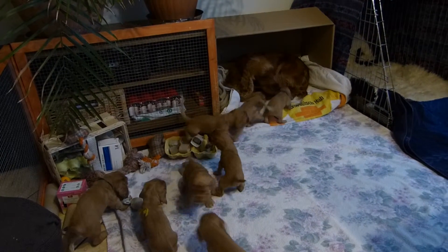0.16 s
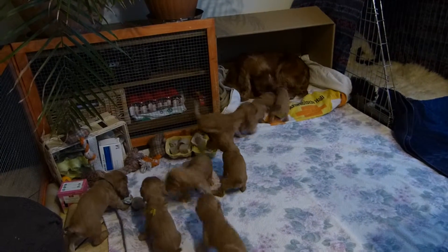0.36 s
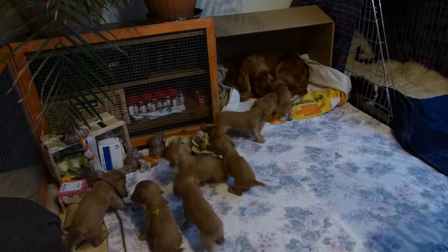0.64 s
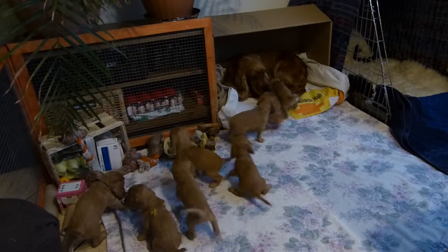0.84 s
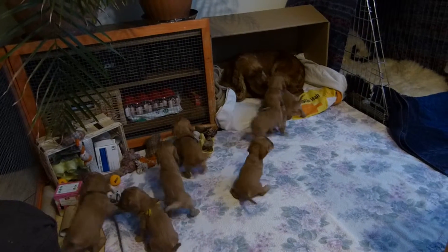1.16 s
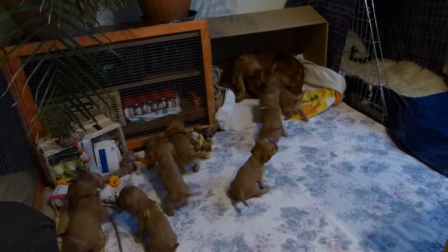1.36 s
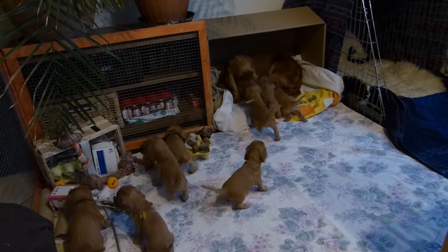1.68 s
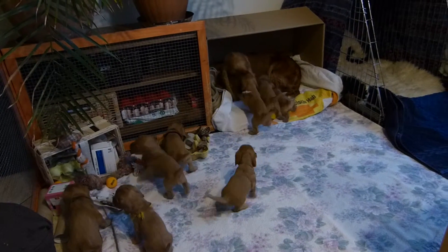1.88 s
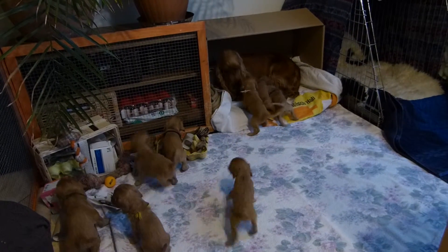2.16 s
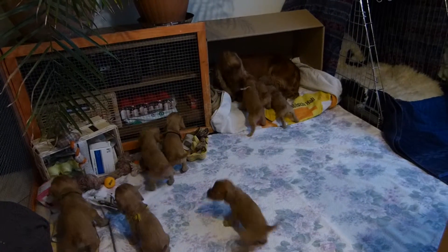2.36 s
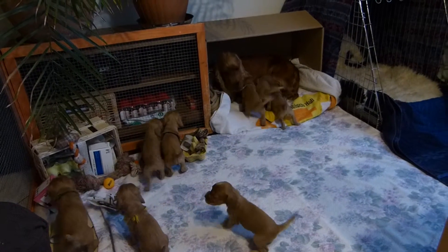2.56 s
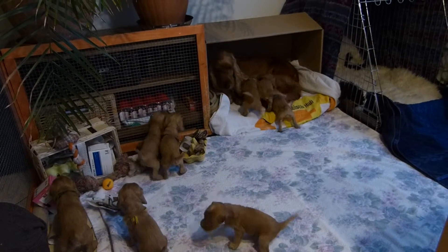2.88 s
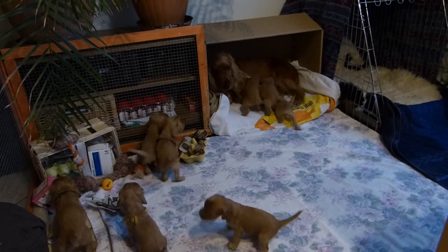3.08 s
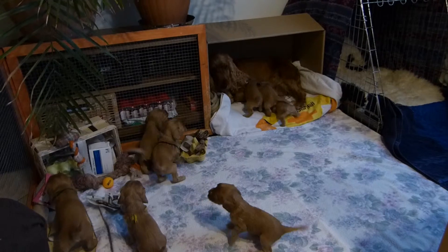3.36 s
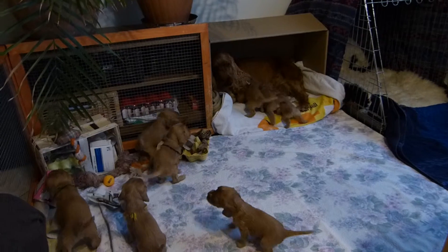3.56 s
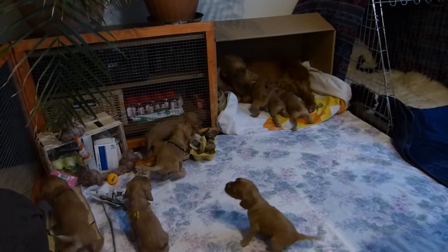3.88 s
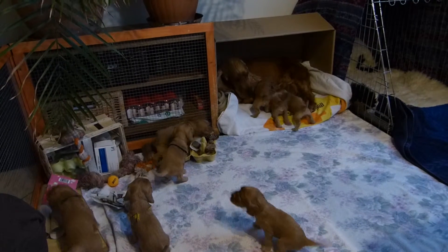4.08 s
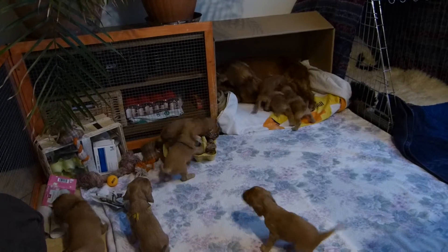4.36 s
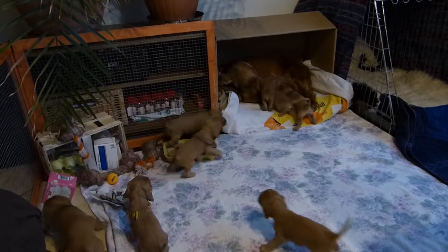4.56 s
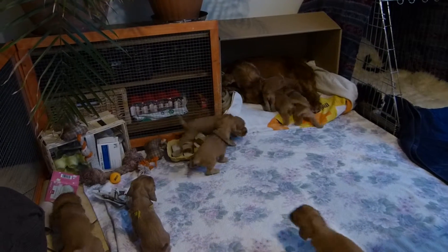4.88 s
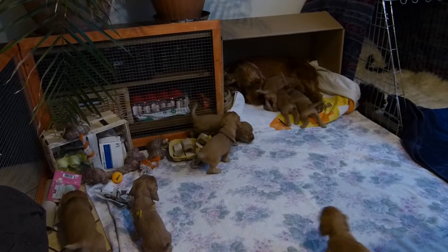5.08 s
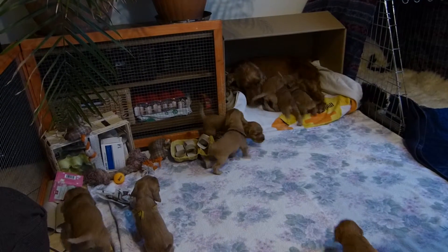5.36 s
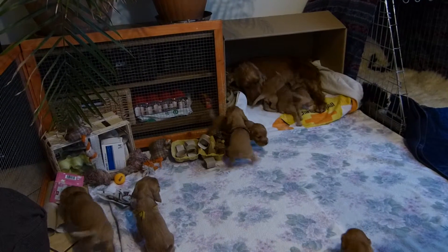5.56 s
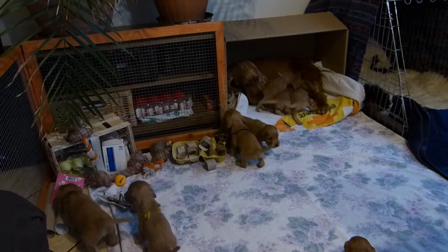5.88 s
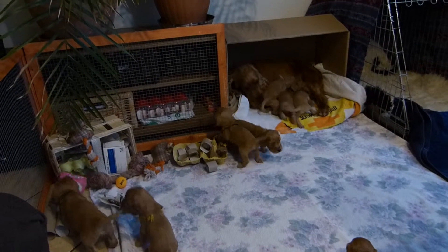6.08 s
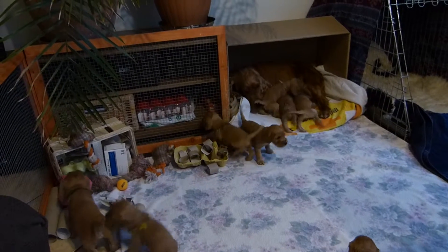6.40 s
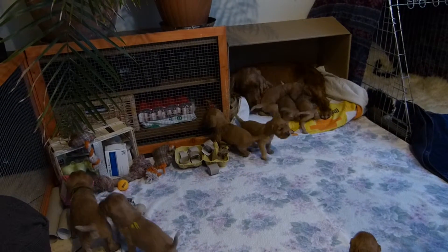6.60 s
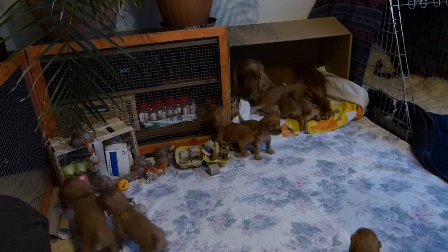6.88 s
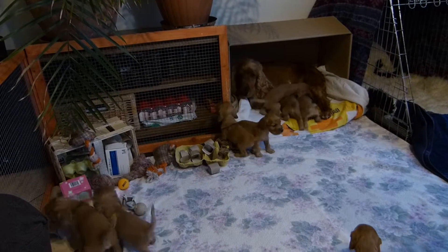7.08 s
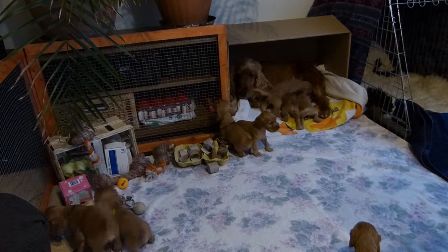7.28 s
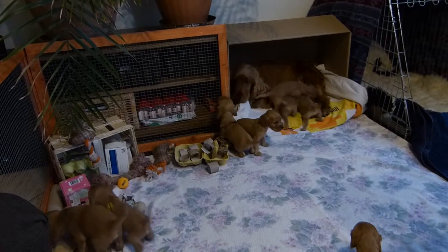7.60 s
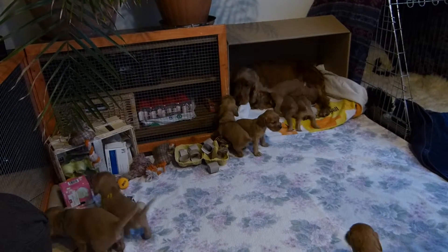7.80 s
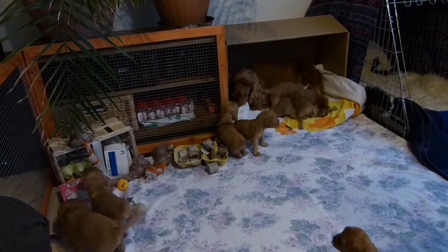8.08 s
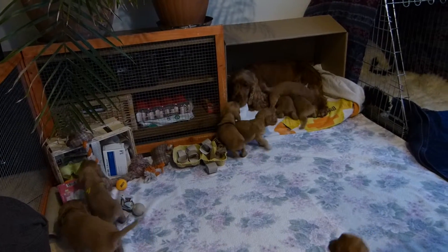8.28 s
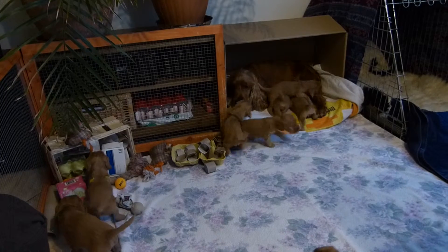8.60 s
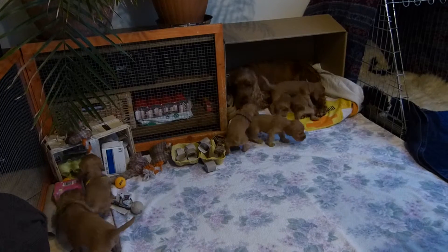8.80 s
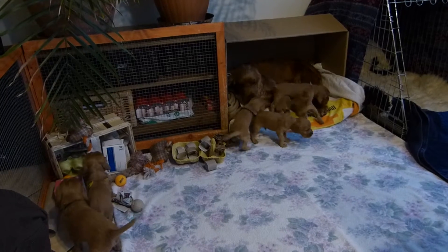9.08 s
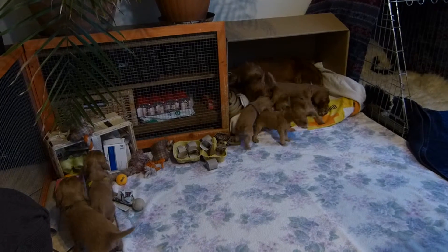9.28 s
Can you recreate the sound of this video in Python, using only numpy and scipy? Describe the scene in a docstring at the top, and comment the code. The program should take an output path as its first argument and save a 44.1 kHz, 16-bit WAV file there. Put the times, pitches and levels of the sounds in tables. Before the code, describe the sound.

A litter of puppies yelps and whimpers in short high cries in a small room, with paws scuffing cloth, claws ticking and soft cardboard knocks.

```python
"""A small room: a litter of puppies squeaks and whimpers round their mother, a few metres from the microphone.
Yelps are thin harmonic tones whose pitch arches; whimpers sag. Throat resonances shape both, and hoarse ones creak.
Paws scuff the sheet in dense noise grains, claws tick in short ringing cracks,
and bodies bump a cardboard box in damped noise bursts. Walls smear all of it, over faint room noise."""
import sys
import numpy as np
from scipy import signal
from scipy.fft import rfft, irfft, next_fast_len
from scipy.io import wavfile
from scipy.ndimage import map_coordinates

SR = 44100
rng = np.random.default_rng(int(sys.argv[2]) if len(sys.argv) > 2 else 0)


def inscribe(sig):
    """Save sig as 16-bit PCM at rate SR to the path in sys.argv[1].

    A 1-D sig is mono; a 2-D sig holds one channel per row.
    Samples are clipped to [-1, 1] before scaling.
    """
    pcm = np.round(np.clip(np.atleast_2d(sig).T, -1, 1) * 32767)
    wavfile.write(sys.argv[1], SR, pcm.astype(np.int16))


N = 416304
TOP_HZ = 15100
LEFT_RIGHT = np.array([[1], [-1]])


def undb(db):
    """Amplitude ratio from dB."""
    return 10 ** (np.asarray(db) / 20)


def unit(x):
    """Scale to rms 1."""
    return x / np.sqrt(np.mean(x ** 2))


def lookup(points, hz):
    """Read (Hz, value) points on a log-frequency axis."""
    point_hz, value = np.transpose(sorted(points))
    return np.interp(np.log(np.maximum(hz, 1)), np.log(point_hz), value)


def colour(x, points):
    """Filter with a (Hz, dB) spectrum scaled to unit mean power."""
    size = next_fast_len(x.shape[-1] + 4096)
    hz = np.linspace(0, SR / 2, size // 2 + 1)
    gain = unit(undb(lookup(points, hz)))
    return irfft(rfft(x, size) * gain, size)[..., :x.shape[-1]]


def wander(n, rate_hz):
    """Smooth random motion of spread near 1, changing about rate_hz times a second."""
    knots = np.arange(n) / SR * rate_hz
    return map_coordinates(rng.standard_normal(4096), [knots], order=3, mode="wrap")


def ring(x, hz, width_hz):
    """One resonance, gain 1 at its centre."""
    return signal.lfilter(*signal.iirpeak(hz, hz / width_hz, fs=SR), x)


def add(track, start_s, sound):
    """Lay a sound into a track at start_s."""
    start = max(int(start_s * SR), 0)
    part = sound[..., :max(N - start, 0)]
    track[..., start:start + part.shape[-1]] += part


def place(x, pan_db):
    """Set a sound between left and right; pan_db is left minus right."""
    return x * undb(pan_db * LEFT_RIGHT / 2)


# Room noise spectrum. Each row: frequency in Hz, relative level in dB.
AIR_SPECTRUM = [(20, -3.5), (60, -16), (120, -15.5), (220, -5.5), (600, -3.5), (2000, -11.5), (3000, -13),
                (5500, -10.5), (10500, -19.5), (15000, -31.5)]


def air(mid_db=-57.5, side_db=-5):
    """Faint steady room noise: coloured noise common to both ears plus a weaker part in opposite phase."""
    mid, side = colour(rng.standard_normal((2, N)), AIR_SPECTRUM)
    return undb(mid_db) * (mid + undb(side_db) * side * LEFT_RIGHT)


# Soft knocks on box and floor. Each row: start in seconds, relative level in dB, hardness in dB, panel ring in Hz.
BUMPS = [(0.113, -43.5, 19.5, 970), (0.878, -30, 9.5, 1000), (1.327, -16, -8.5, 680),
         (1.496, -31.5, 3, 1250), (2.568, -42, 2.5, 675), (3.632, -21.5, -7, 510), (3.701, -24, 4, 480),
         (4.112, -27, -17, 980), (4.482, -30.5, 9, 443), (5.61, -27, -5.5, 464), (6.046, -33.5, -22.5, 630),
         (6.495, -25, -6, 734), (6.815, -23.5, -2, 930), (6.958, -24.5, -17, 674), (7.756, -23.5, -13, 907),
         (7.996, -25.5, -13, 545), (8.786, -23.5, -5.5, 650)]
# Cardboard box spectrum. Each row: frequency in Hz, relative level in dB.
BOX_SPECTRUM = [(50, -53), (115, -18), (170, -13.5), (230, -6.5), (330, -12), (440, -4), (630, 0),
                (900, -2.5), (1400, 1), (2000, -10.5), (5000, -14.5), (15000, -39.5)]


def bumps(fade_s=0.018, rise_s=0.0028, crumple_db=4, gain_db=-9.0, edge_hz=1000, panel_db=2, panel_width_hz=150):
    """A padded push shakes the heavily damped cardboard and rings the panel it meets; harder contact is brighter."""
    out = np.zeros(N)
    t = np.arange(SR // 5) / SR
    lowpass = signal.butter(1, edge_hz, fs=SR, output="sos")
    for start_s, level_db, hardness_db, ring_hz in BUMPS:
        push = rng.standard_normal(len(t)) * np.exp(-t / fade_s) * (1 - np.exp(-t / rise_s))
        push = push * undb(crumple_db * wander(len(t), 300))
        soft = signal.sosfilt(lowpass, push)
        knock = soft + undb(hardness_db) * (push - soft)
        panel = undb(panel_db) * ring(knock, ring_hz, panel_width_hz)
        add(out, start_s, undb(level_db + gain_db) * (knock + panel))
    return colour(out, BOX_SPECTRUM)


# Claws and small hard things. Each row: start in seconds, relative level in dB, ring in Hz.
TICKS = [(0.383, -27, 5000), (1.011, -24.5, 3460), (1.148, -32, 3660), (1.1807, -25, 4700),
         (1.435, -29, 4130), (1.4862, -19, 3840), (1.7665, -30, 4600), (2.5666, -17.5, 4150),
         (2.7067, -31, 4840), (2.944, -29, 5140), (3.1276, -38, 5140), (3.9446, -40, 5540),
         (4.4467, -17, 4020), (4.582, -28.5, 4000), (4.713, -26.5, 3700), (4.8389, -15, 4600),
         (5.3033, -34, 3900), (5.5856, -50, 5600), (6.5156, -27, 5100), (7.7553, -40, 4550),
         (8.1192, -37, 5000)]


def ticks(fade_s=0.0016, gain_db=-3, ring_db=8, ring_width_hz=160):
    """Claws catch on hard things in short bright cracks, and each thing rings briefly."""
    out = np.zeros(N)
    t = np.arange(SR // 20) / SR
    for start_s, level_db, ring_hz in TICKS:
        crack = rng.standard_normal(len(t)) * np.exp(-t / fade_s)
        ringing = undb(ring_db) * ring(crack, ring_hz, ring_width_hz)
        add(out, start_s, undb(level_db + gain_db) * (crack + ringing))
    return colour(out, [(500, -14.5), (2300, 1.5), (4400, 5.5), (9000, -12), (15000, -34)])


# Paws and bellies dragging over cloth.
# Each row: loudest moment in seconds, swell in seconds, fade in seconds, relative level in dB.
SCUFFS = [(0.017, 0.19, 0.015, -29.5), (.32, 0.035, 0.18, -36.5), (.58, 0.017, 0.16, -45),
          (.88, 0.016, 0.022, -53), (1.012, 0.017, 0.033, -36), (1.19, 0.12, 0.042, -40),
          (1.329, 0.028, 0.012, -31), (1.494, 0.068, 0.045, -29), (1.776, 0.023, 0.023, -32),
          (2.05, 0.19, 0.1, -40.5), (2.566, 0.023, 0.081, -33), (2.76, 0.13, 0.42, -43),
          (2.949, 0.0054, 0.041, -32), (3.135, 0.019, 0.22, -41.5), (3.308, 0.01, 0.047, -35.5),
          (3.415, 0.02, 0.021, -32.5), (3.55, 0.061, 0.058, -41), (3.67, 0.031, 0.035, -37.5),
          (3.85, 0.023, 0.021, -42.5), (4.12, 0.08, 0.031, -35.5), (4.3, 0.015, 0.045, -44.5),
          (4.453, 0.02, 0.034, -26), (4.71, 0.055, 0.022, -35.5), (4.837, 0.03, 0.031, -23),
          (4.93, 0.033, 0.075, -37), (5.188, 0.033, 0.063, -37.5), (5.425, 0.013, 0.051, -46),
          (5.589, 0.0016, 0.037, -36.5), (5.699, 0.047, 0.034, -38), (5.975, 0.026, 0.15, -46),
          (6.266, 0.004, 0.09, -40), (6.522, 0.0057, 0.048, -42), (7.755, 0.0098, 0.026, -40),
          (8.005, 0.012, 0.039, -47), (8.124, 0.0077, 0.15, -43.5), (8.46, 0.016, 0.057, -46.5),
          (8.789, 0.027, 0.037, -36)]
# Restless stirring of the litter. Each row: time in seconds, relative level in dB.
STIRRING = [(0, -56.5), (4.7, -53.5), (5.1, -63.5), (9.4, -64)]
# Rubbed cloth spectrum, low and high parts. Each row: frequency in Hz, relative level in dB.
CLOTH_LOW = [(100, -54), (200, -33.5), (400, -16), (1000, 0.5)]
CLOTH_HIGH = [(1530, -1), (2600, -6), (4010, -1), (4380, -4.5), (4740, 0.5), (6650, -5.5), (12300, -21.5),
              (15000, -55.5)]


def scuffs(grain_db=4, catch_db=2.5, stir_db=4.0, snag_rate_hz=30, snag_db=9, snag_s=0.00081):
    """Cloth fibres catch and let go in dense grains; claws snag threads; the litter never lies quite still."""
    t = np.arange(N) / SR
    power = undb(np.interp(t, *np.transpose(STIRRING)) + stir_db * wander(N, 14)) ** 2
    for peak_s, swell_s, fade_s, level_db in SCUFFS:
        distance = np.maximum((peak_s - t) / swell_s, (t - peak_s) / fade_s)
        power = power + undb(level_db) ** 2 * np.exp(-2 * np.minimum(distance, 20))
    noise = rng.standard_normal(N)
    grain_level_db = grain_db * np.minimum(rng.exponential(size=N), 4) + catch_db * wander(N, 160)
    grains = unit(noise * undb(grain_level_db))
    # each snagged thread lets go with a small decaying crackle
    snags = (rng.random(N) < snag_rate_hz / SR) * rng.random(N)
    crackle = signal.lfilter([1], [1, -np.exp(-1 / (snag_s * SR))], snags)
    grains = unit(grains * (1 + undb(snag_db) * crackle))
    return colour(grains, CLOTH_LOW + CLOTH_HIGH) * np.sqrt(power)


def course(t, rest, lead_s, turn_hz, width_in_s, width_out_s):
    """Pitch in Hz follows a bell: from near its resting multiple of turn_hz into the turn, and back again."""
    width_s = np.where(t < lead_s, width_in_s, width_out_s)
    return turn_hz * (rest + (1 - rest) * np.exp(-((t - lead_s) / width_s) ** 2))


# Strength of the voice by pitch, greatest on the mouth's main resonance.
# Each row: pitch in Hz, relative level in dB.
STRENGTH = [(300, -17.5), (700, -11.5), (950, -7), (1300, -9.5), (1700, -6), (1950, 1.5), (2150, -2),
            (2500, -10.5), (3200, -26)]


def loudness(t, length_s, pitch_hz, start_db, attack_s=0.022, release_db=-6, release_s=0.026, tire_db_per_s=-27):
    """Level in dB: attack, a tiring hold and release, swelling where the pitch meets the mouth's resonance."""
    start = start_db * np.exp(-t / attack_s)
    end = release_db * np.exp(-np.maximum(length_s - t, 0) / release_s)
    return start + end + tire_db_per_s * t + lookup(STRENGTH, pitch_hz)


# Resonances of a puppy's throat and mouth. Each row: frequency in Hz, relative level in dB.
THROAT = [(300, -16), (700, -5), (1300, -2), (1950, 3.5), (2450, -2), (3200, -20), (4200, -14), (5100, -8),
          (6100, -6), (6800, -9), (7800, -15), (10300, -16), (14000, -64.5)]
# The muzzle's facing adds nothing below the first frequency and its full dB above the second.
BEAM_HZ = (2980, 9600)


def cry(row, rest, facing_db, split=0.26, hiss_db=-25, hiss_hz=4900, hiss_width_hz=3600,
        jitter=0.0034, low_jitter=0.0049, clear_hz=1500, fray=0.39, shimmer=0.25, flutter_db=4,
        attack_s=0.00404, release_s=0.005, slope_db=-1.0, even_db=-3, rasp_db=-23, count=17,
        creak_s=0.085, creak_jitter=0.079, creak_rasp=0.39):
    """Vocal folds drive the throat, which lifts each harmonic as it glides past a resonance; low cries waver more."""
    lead_s, trail_s, turn_hz, width_in_s, width_out_s, effort_db, start_db, second_db, upper_db, hoarse = row
    length_s = lead_s + trail_s
    total_s = length_s + 2 * release_s
    t = np.arange(int(total_s * SR)) / SR
    n = len(t)
    pitch = course(t, rest, lead_s, turn_hz, width_in_s, width_out_s)
    level_db = effort_db + loudness(t, length_s, pitch, start_db)

    # late in a hoarse cry the folds break into a rasping creak
    slack = np.clip(2 * (1 - pitch / clear_hz), 0, 1)
    creak = hoarse * np.clip((t - lead_s) / creak_s, 0, 1) ** 2
    scatter = jitter + low_jitter * slack + creak_jitter * creak
    pitch = pitch * (1 + scatter * wander(n, 257.1))
    phase = 2 * np.pi * np.cumsum(pitch) / SR

    tone = np.sin(phase)
    for k in range(2, count):
        folds_db = second_db if k == 2 else upper_db + slope_db * (k - 3) + even_db * (k % 2 == 0)
        throat_db = lookup(THROAT, k * pitch) - lookup(THROAT, pitch)
        beam_db = facing_db * np.interp(k * pitch, BEAM_HZ, (0, 1))
        # uneven closure: overtones come and go, and in a hoarse cry the high ones fray
        overtone = np.sin(k * (phase + fray * hoarse * wander(n, 452))) * (k * pitch < TOP_HZ)
        tone = tone + undb(folds_db + throat_db + beam_db + flutter_db * wander(n, 73.2)) * overtone

    rasp = undb(rasp_db) * (1 + slack) + creak_rasp * creak
    tone = tone * (1 + shimmer * wander(n, 153.0) + rasp * wander(n, 700))
    # in the creak every second cycle is weaker, which splits the tone
    tone = tone * (1 + split * creak * np.sin(phase / 2))
    gate = np.clip(t / attack_s, 0, 1) * np.clip((total_s - t) / (2 * release_s), 0, 1)
    # turbulence at the folds hisses in the upper throat; it follows effort, whatever the pitch
    puffs = rng.standard_normal(SR)[:n] * (1 + np.cos(phase))
    puffs = puffs * undb(hiss_db - lookup(STRENGTH, pitch))
    hiss = ring(ring(puffs, hiss_hz, hiss_width_hz), hiss_hz, hiss_width_hz)
    return (np.sqrt(2) * tone + hiss) * gate * undb(level_db)


# Yelps, pitch arching over a crest. Each row: start in seconds, lead to the crest in seconds,
# trail after it in seconds, crest pitch in Hz, width of the rise in seconds, width of the fall in seconds,
# effort in dB, start offset in dB, 2nd harmonic in dB, upper harmonics in dB, hoarseness 0-1.
YELPS = [ (0.0, 0.032, 0.027, 2006, 0.21, 0.05, -20, 3.5, 2, -6, 0.05),
         (.195, 0.086, 0.059, 1927, 0.11, 0.062, -16.5, -15.5, -11, -7.5, 0.1),
         (.505, 0.047, 0.051, 1383, 0.084, 0.1, -17, -14.5, -6, -14.5, 0),
         (1.005, 0.075, 0.029, 1062, 0.072, 0.026, -27.5, -12, -5, -21, 0.8),
         (1.27, .042, 0.052, 1467, .085, .065, -19, -18, -8.5, -10, 0.3),
         (1.87, 0.049, 0.073, 1923, 0.051, 0.072, -20.5, -9, -8, -11, 0.25),
         (2.16, 0.062, 0.082, 1548, 0.084, 0.078, -25.5, -7, -5.5, -6, 0.5),
         (2.5, 0.075, 0.007, 1477, .11, 0.095, -24, -16.5, -5, -2, .3),
         (3.048, 0.069, 0.031, 974, .055, 0.072, -31, -1.5, -2.5, -11, 0),
         (3.327, 0.046, 0.1, 1933, 0.086, 0.051, -22.5, -0.5, -7, -11.5, 0.21),
         (3.634, 0.063, 0.11, 1865, 0.073, 0.071, -22, -4, -10, -12, 0.39),
         (3.985, .062, 0.17, 1772, 0.072, 0.1, -21.5, -3.5, -9.5, -9, 0.24),
         (4.382, 0.069, 0.14, 1823, 0.081, 0.082, -22, -5, -7, -8, 0.61),
         (4.725, 0.067, 0.16, 1783, 0.071, 0.089, -22.5, -4, -5, -6, 0.58),
         (5.118, .042, 0.0028, 1087, 0.062, 0.065, -26, -6.5, -11, -9.5, 0.6),
         (5.43, 0.063, 0.044, 731, 0.12, 0.14, -49, -5.5, 2, -21, .6),
         (6.295, 0.0064, 0.0016, 2013, 0.048, 0.024, -7.5, -5, -7, -19, 0.4),
         (6.319, 0.066, 0.11, 3185, .053, 0.7, -16.5, 5, -14.5, -25, 0.2),
         (6.605, 0.0029, 0.031, 1875, .05, 0.078, -21.5, -8, 0, -11, .5),
         (6.622, .078, 0.108, 3090, 0.06, .19, -19.5, -3, -13, -19.5, 0.08),
         (6.907, 0.0095, 0.028, 1367, 0.15, 0.04, -26.5, -5.5, -10, -8.5, .7),
         (6.975, 0.071, 0.14, 2531, 0.084, 0.068, -27, -7, -14, -7.5, 1),
         (7.308, 0.018, 0.0028, 955, 0.028, 0.073, -25.5, -4, -19, -20, 1),
         (7.522, 0.027, 0.071, 1973, 0.16, 0.07, -32.5, -30, -3, -12, 0.6),
         (7.785, 0.062, 0.074, 1867, 0.16, 0.077, -31.5, -22, -8.5, -12.5, 0.6),
         (8.085, 0.058, 0.061, 2452, 0.068, 0.046, -29, -14.5, -10, -13, 0.4),
         (8.895, 0.048, 0.003, 2169, 0.097, .1, -21.5, -7.5, -8.5, -14, 0.3),
         (9.123, 0.079, 0.014, 2158, 0.11, 0.03, -22, -7, 0, -8, 0),
         (9.39, 0.06, .0026, 1792, 0.084, .08, -24.5, -1.5, -2, -5.5, 0.2), ]
# Whimpers, pitch sagging into a trough. Each row: start in seconds, lead to the trough in seconds,
# trail after it in seconds, trough pitch in Hz, width of the fall in seconds, width of the rise in seconds,
# effort in dB, start offset in dB, 2nd harmonic in dB, upper harmonics in dB, hoarseness 0-1.
WHIMPERS = [ (.7, 0.045, 0.014, 725, 0.16, 0.24, -35, -15, 9, -10.5, 0.16),
            (.8, 0.045, 0.063, 734, 0.073, 0.18, -23.5, -25, -5, -17, 0),
            (1.06, .035, 0.042, 1960, 0.0523, 0.04, -34.5, -4, -20, -24, 1),
            (1.085, 0.019, 0.061, 658, 0.048, 0.0625, -29.5, -1, -12, -23, 0),
            (1.493, 0.031, 0.027, 875.5, .022, 0.17, -17, -2.5, -15, -23, 0.5),
            (1.578, 0.0096, 0.053, 1283, 0.044, 0.13, -18, -14, -11.5, -13.5, 0.8),
            (1.675, 0.041, 0.021, 611.6, 0.029, 0.047, -18.5, -11, -14, -17, 0.54),
            (1.86, .03, 0.081, 818.6, 0.05, 0.2, -24.5, 0.5, -18, -18.5, 0),
            (2.155, 0.027, 0.029, 348, 0.025, 0.037, -35.5, 7.5, -8.5, -30, 0.14),
            (2.39, 0.072, 0.0029, 272, 0.086, .08, -37, 3, -12, -39, 0.9), ]
# Pitch far from the turn, as a multiple of the pitch at the turn.
YELP_REST, WHIMPER_REST = 0.48, 1.6
# The huddle at the microphone. Each row: time in seconds, left minus right in dB, treble from muzzle facing in dB.
LITTER = [(0, 2, -7), (.7, 1.5, 20), (1.4, 2, -1), (3.2, 1.8, -0.5), (4.6, 1, -4.5), (6.3, 3, -4),
          (8.2, 3.5, -3.5), (9.2, 1, 4)]


def puppies():
    """Yelps and whimpers overlap freely; the calling moves and turns about in the huddle."""
    out = np.zeros(N)
    times_s, pan_db, facing_db = np.transpose(LITTER)
    for table, rest in (YELPS, YELP_REST), (WHIMPERS, WHIMPER_REST):
        for start_s, *row in table:
            add(out, start_s, cry(row, rest, np.interp(start_s, times_s, facing_db)))
    return place(out, np.interp(np.arange(N) / SR, times_s, pan_db))


# Reverberation. Each row: frequency in Hz, 60 dB decay time in seconds.
ROOM_T60 = [(200, 0.79), (1000, 0.56), (2000, 0.45), (5000, 0.33), (12000, 0.46)]


def room(x, wet_db, likeness, gap_s, build_s=0.002, apart_hz=7000):
    """Direct sound, then dense wall reflections; their treble dies sooner and differs more between the ears."""
    t = np.arange(int(0.7 * SR)) / SR
    hz, cell_s, (mid, side) = signal.stft(rng.standard_normal((2, len(t))), SR, nperseg=256)
    alike = np.clip(likeness, 0, 1) * np.exp(-(hz[:, None] / apart_hz) ** 2)
    cells = np.sqrt(1 + alike) * mid + np.sqrt(1 - alike) * np.array([side, -side])
    decay = np.exp(-np.log(1000) * cell_s / lookup(ROOM_T60, hz)[:, None])
    tail = signal.istft(cells * decay, SR)[1][:, :len(t)]
    # the nearest surfaces answer first and strongest
    tail = tail * np.clip((t - gap_s) / build_s, 0, 1) * (1 + 2.37 * np.exp(-t / 0.013))
    response = unit(tail) / np.sqrt(len(t)) * undb(wet_db)
    return x + signal.fftconvolve(x, response, axes=1)[:, :N]


def scene():
    """Cries, scuffs, clicks and knocks share the room; all but the cries sit steadily to the left."""
    cries = room(undb(1.5) * puppies(), wet_db=-0.5, likeness=0.7, gap_s=0.0052)
    rustle = room(place(undb(-2.5) * scuffs(), pan_db=3.0), wet_db=-2.0, likeness=0.027, gap_s=0.00094)
    clicks = room(place(ticks(), pan_db=4.0), wet_db=2.0, likeness=0.18, gap_s=0.0067)
    knocks = room(place(bumps(), pan_db=3.0), wet_db=1.5, likeness=0.35, gap_s=0.0075)
    return air() + knocks + clicks + rustle + cries


def record(dry, offset=-0.0031):
    """The recorder cuts the top and sits slightly off zero."""
    lowpass = signal.ellip(8, 0.2, 70, TOP_HZ, fs=SR, output="sos")
    return signal.sosfilt(lowpass, dry) + offset


dry = scene()
out = record(dry)
inscribe(out)
```